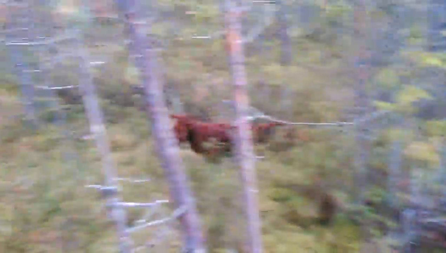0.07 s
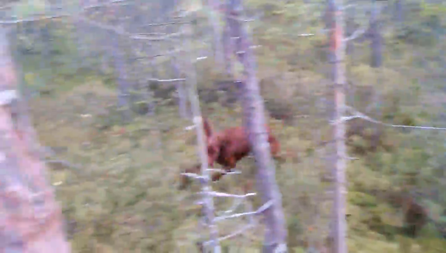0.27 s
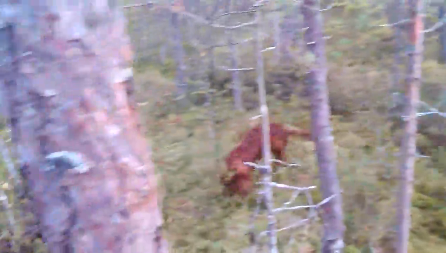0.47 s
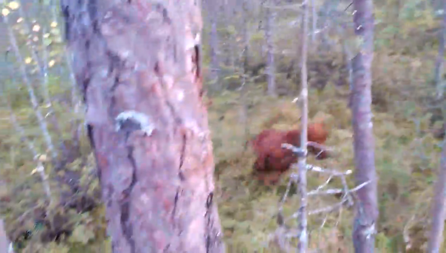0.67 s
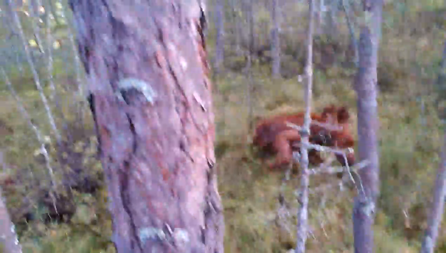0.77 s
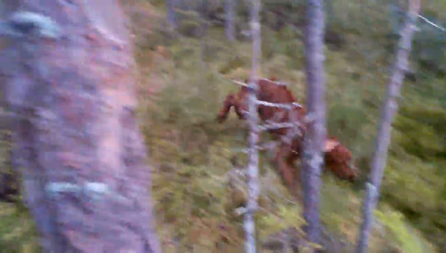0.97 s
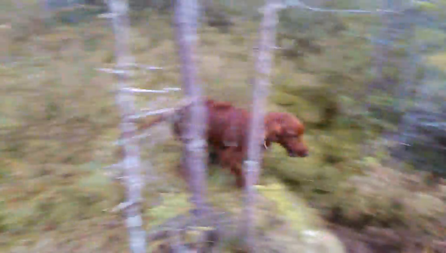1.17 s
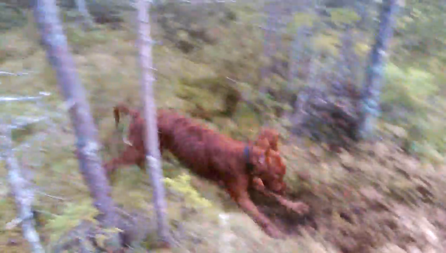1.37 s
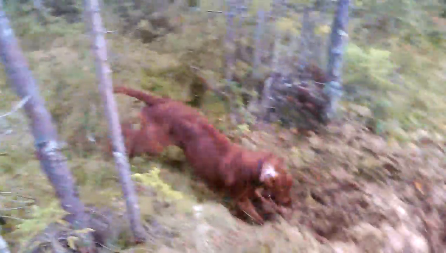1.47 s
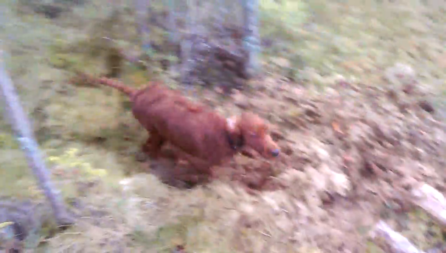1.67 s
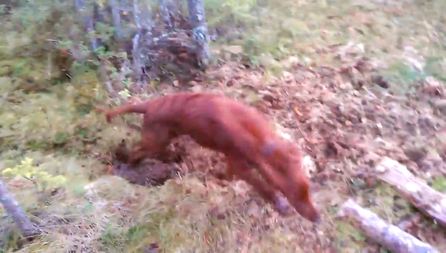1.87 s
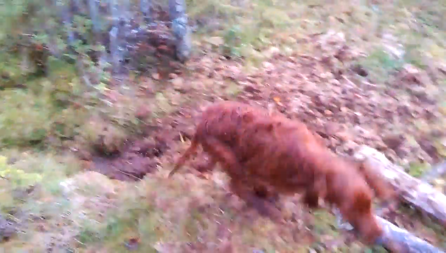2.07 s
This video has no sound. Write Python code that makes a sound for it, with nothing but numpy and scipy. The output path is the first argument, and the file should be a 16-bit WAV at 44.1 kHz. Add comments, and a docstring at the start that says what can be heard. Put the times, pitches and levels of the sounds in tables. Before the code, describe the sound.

Leaves swish and twigs crackle and snap under a dog's paws in a quiet forest.

```python
"""A dog in the undergrowth

A dog trots through low forest shrubs onto dry litter. Its legs swish through leaves and its paws
crush twigs: both are showers of tiny impulses. Twigs snap, sticks and roots knock in damped
vibration, and the soft ground thuds. Metal on its collar tinkles in its natural modes.
Trunks scatter a faint echo, and quiet forest air lies behind."""
import sys
import numpy as np
from scipy import signal
from scipy.fft import rfft, irfft
from scipy.io import wavfile
from scipy.ndimage import uniform_filter1d

SR = 44100
rng = np.random.default_rng(int(sys.argv[2]) if len(sys.argv) > 2 else 0)


def transcribe(signal):
    """Save signal, clipped to [-1, 1], as a 16-bit WAV file at the path in sys.argv[1]."""
    frames = np.atleast_2d(signal).T
    limited = np.clip(frames, -1, 1)
    pcm = np.round(limited * 32767).astype(np.int16)
    wavfile.write(sys.argv[1], SR, pcm)


N = 93183

# Swells of hiss: at 0.035 s a brief, faint puff around the first click; elsewhere legs brushing leaves.
# Each row: peak time, rise and fall in seconds, relative level in dB, rustle against hiss or ticks in dB.
HISS_SWELLS = [(.01, 0.0033, 0.0062, -50, -2.5), (.035, 0.0012, 0.0055, -46, -8),
               (.092, 0.049, 0.096, -55, -6), (.243, 0.027, 0.01, -62, -26),
               (.333, 0.03, 0.047, -48.5, -14.5), (.39, 0.033, 0.077, -54, -10),
               (.485, 0.023, 0.016, -54, -9.5), (.575, 0.045, 0.017, -55, -25),
               (.627, 0.027, 0.014, -55, -29), (.67, 0.022, 0.028, -55.5, -6),
               (.775, 0.013, 0.02, -57.5, -21), (.82, 0.17, 0.36, -63.5, -18),
               (.953, 0.03, 0.036, -52, -2.5), (1.058, 0.03, 0.032, -50.5, -9.5),
               (1.16, 0.025, 0.028, -49, -9), (1.208, 0.036, 0.014, -58, -0.5),
               (1.26, 0.04, 0.063, -57.5, -7.5), (1.436, 0.03, 0.021, -49.5, -9.5),
               (1.53, 0.084, 0.064, -66, -1), (1.63, 0.033, 0.018, -60, -9), (1.72, 0.005, 0.013, -60.5, 7),
               (1.755, 0.007, 0.05, -68.5, 9), (1.872, 0.019, 0.0053, -62.5, 6),
               (1.907, 0.016, 0.014, -50, -24), (1.967, 0.037, 0.0078, -59, 2.5),
               (2.025, 0.053, 0.068, -56, -15), (2.058, 0.024, 0.012, -53, -5), (2.1, 0.011, 0.048, -75, 6)]
# Spectra of the hiss, the rustle and the ticks. Each row: frequency in Hz, relative level in dB.
HISS_SPECTRUM = [(2000, -30), (4000, -6), (6000, -0.5), (8200, 6.5), (10300, 3.5), (12000, 0),
                 (16000, -12.5)]
RUSTLE_SPECTRUM = [(200, -5.5), (650, 5.5), (1400, -6), (2200, -2.5), (3000, -4.5), (5000, 1), (8000, 1.5),
                   (16000, -37.5)]
TICK_SPECTRUM = [(1500, -22), (4500, -24.5), (8000, -4.5), (11000, 4), (15500, -10)]

def swishes(shower_db=-1, ticks_db=-8):
    """Superposition: dense impulses merge into a hiss over a lower rustle; sparse ones tick."""
    shower = contacts(HISS_SWELLS, HISS_SPECTRUM, RUSTLE_SPECTRUM,
                      grains_per_s=6500, scatter_db=2.5, ripple_db=9.5)
    ticks = contacts(HISS_SWELLS, TICK_SPECTRUM, RUSTLE_SPECTRUM,
                     grains_per_s=600, scatter_db=-0.5, ripple_db=-4.0)
    return undb(shower_db) * shower + undb(ticks_db) * ticks


# Paws crushing twigs. Each row: peak time, rise and fall in seconds, level in dB,
# wood against the splinters in dB.
TWIG_CRUSHES = [(1.429, 0.018, 0.0098, -64, 7.5), (1.4425, 0.0059, 0.0027, -50.5, -2.5),
                (1.449, 0.0079, 0.005, -32.5, -8), (1.457, 0.0015, 0.0069, -38, -6),
                (1.466, 0.005, 0.015, -46, 0), (1.6663, 0.0014, 0.00091, -32, -23),
                (1.6688, 0.00087, 0.0037, -34, -20), (1.6727, 0.00048, 0.0036, -34.5, 3),
                (1.677, 0.00094, 0.0023, -30, -14), (1.689, 0.018, 0.014, -43, -9.5),
                (1.874, 0.026, 0.015, -58.5, 0.5), (1.889, 0.0063, 0.024, -66, 13.5)]
# Spectra of splinters and wood. Each row: frequency in Hz, relative level in dB.
SPLINTER_SPECTRUM = [(800, -42), (2500, -16.5), (4000, 3.5), (5500, -2), (7500, 7), (10500, 3.5),
                     (12500, 4), (16000, -10)]
WOOD_SPECTRUM = [(100, -27.5), (300, -1), (480, -10), (800, 4), (1000, -16), (1300, 10), (1650, -12),
                 (2000, -0.5), (2500, -1.5), (3000, -1.5), (3800, -4.5), (7000, -9), (16000, -76)]

def crunches():
    """Impulsive excitation: fibres splinter under a paw and shake the wood around them."""
    return contacts(TWIG_CRUSHES, SPLINTER_SPECTRUM, WOOD_SPECTRUM,
                    grains_per_s=8700, scatter_db=2.5, ripple_db=11.5)


# Twigs breaking. Each row: start in seconds, peak level in dB.
TWIG_BREAKS = [(0.0345, -33), (0.335, -40), (.476, -46), (0.485, -52), (.958, -35), (0.9624, -41),
               (1.0506, -42), (1.1493, -47), (1.1543, -47), (1.4453, -39), (1.453, -47), (1.465, -34),
               (1.618, -44), (1.629, -40), (1.639, -40), (1.668, -10), (1.6915, -36), (1.6955, -48)]
# Spectrum of a crack. Each row: frequency in Hz, relative level in dB.
CRACK_SPECTRUM = [(500, -10), (2500, -10), (5100, -5), (7000, -1.5), (9200, 11.5), (10600, 8.5),
                  (13500, -39), (16000, 5)]

def snaps():
    """Brittle fracture: a dry twig parts in one bright impulse."""
    out = np.zeros(N)
    crack = colour(signal.unit_impulse(512), CRACK_SPECTRUM)
    for start, db in TWIG_BREAKS:
        add(out, start, undb(db) * crack / np.abs(crack).max())
    return out


# Paws striking sticks, buried roots and soil. Each row: start in seconds, pitch in Hz, level in dB.
STICK_KNOCKS = [(.089, 644, -53), (.090, 2090, -50.5), (1.205, 2450, -57.5), (1.207, 3830, -45.5),
                (1.21, 4200, -46), (1.413, 762, -44.5), (1.414, 1000, -55), (1.441, 1910, -40),
                (1.442, 1290, -34), (1.449, 1400, -49), (1.457, 1360, -52), (1.458, 1970, -58),
                (1.740, 712, -49), (1.754, 660, -45), (1.870, 3030, -37.5), (1.871, 1790, -48),
                (1.873, 1104, -43), (1.880, 1160, -47), (1.881, 1670, -41), (1.8895, 1700, -38.5),
                (1.889, 1025, -47.5), (1.968, 2030, -49.5)]
ROOT_KNOCKS = [(.755, 310, -68), (.79, 334, -54), (.815, 337, -60)]
GROUND_THUDS = [(1.446, 262, -42.5), (1.471, 280, -59), (1.522, 304, -51), (1.673, 182, -54),
                (1.894, 121, -57), (1.963, 142, -59)]

def paw_impacts():
    """Damped vibration: sticks ring for a few cycles, roots for fewer, soft ground hardly at all."""
    sticks = blows(STICK_KNOCKS, decay_cycles=6.4, rasp=0.09, attack_s=0.00067, detune=0.079)
    roots = blows(ROOT_KNOCKS, decay_cycles=3.3, rasp=0.066, attack_s=0.0026, detune=0.086)
    ground = blows(GROUND_THUDS, decay_cycles=0.91, rasp=0.11, attack_s=0.0031, detune=0.079)
    return sticks + roots + ground


# Touches of the collar metal. Each row: start in seconds, relative level in dB, side-mode gain in dB.
COLLAR_TOUCHES = [(.237, -54.5, -12), (0.768, -54.5, 5.5), (.776, -58, -5), (0.864, -47.5, -21),
                  (.873, -37.5, -16), (0.879, -56, -11), (.885, -56, -1), (0.9, -56, -3),
                  (.914, -53.5, -15)]
# Its modes, the main one first. Each row: frequency in Hz, gain in dB, seconds to decay by 60 dB.
COLLAR_MODES = [(10190, 2, .08), (7420, -0.5, 0.058), (9530, 3, 0.049), (13100, 6, 0.034),
                (15400, 1, 0.094)]
# Spectrum of its chatter. Each row: frequency in Hz, relative level in dB.
CHATTER_SPECTRUM = [(6000, -26.5), (7800, -16), (8600, -3), (9800, -2), (10300, 11.5), (11000, -11),
                    (13000, -47), (16000, -31)]

def collar(chatter_db=-7, chatter_s=0.021, attack_s=0.00076, wobble=0.00584, wobble_s=0.0041):
    """Modal ringing: each touch chatters and excites the metal; loose contact unsettles its pitch."""
    out = np.zeros(N)
    t = np.arange(SR // 5) / SR
    for start, db, _ in COLLAR_TOUCHES:
        chatter = unit(colour(rng.standard_normal(len(t)), CHATTER_SPECTRUM))
        add(out, start, undb(db + chatter_db) * chatter * np.exp(-t / chatter_s))
    for mode, (hz, mode_db, t60) in enumerate(COLLAR_MODES):
        amplitude = np.zeros(N)
        envelope = np.exp(-np.log(1000) * t / t60) * (1 - np.exp(-t / attack_s))
        for start, db, side_db in COLLAR_TOUCHES:
            add(amplitude, start, undb(db + mode_db + side_db * (mode > 0)) * envelope)
        jitter = unit(uniform_filter1d(rng.standard_normal(N), int(wobble_s * SR)))
        pitch_hz = hz * (1 + wobble * jitter)
        out += amplitude * np.sin(2 * np.pi * np.cumsum(pitch_hz) / SR)
    return out


# Weight pressing on moss. Each row: peak time, rise and fall in seconds, level in dB,
# hollow sound against the rumble in dB.
MOSS_BUMPS = [(.235, 0.022, 0.011, -63, -14), (.45, 0.027, 0.011, -71, -3.5), (.545, 0.024, 0.05, -65, -1),
              (.73, 0.028, 0.034, -59.5, -7), (.805, 0.11, 0.12, -67.5, 1.5), (.945, 0.1, 0.021, -87, 3),
              (1.05, 0.028, 0.026, -63, -13), (1.18, 0.046, 0.035, -65, -23),
              (1.465, 0.015, 0.023, -54, -33), (1.54, 0.026, 0.046, -61.5, -2),
              (1.615, 0.014, 0.017, -63.5, 3.5), (1.677, 0.0023, 0.007, -75, -3),
              (1.74, 0.026, 0.044, -76, -8), (1.897, 0.028, 0.0095, -52.5, -15),
              (1.965, 0.036, 0.016, -66, 3), (2.075, 0.012, 0.078, -66.5, 2)]
# Spectra of the rumble and the hollow sound. Each row: frequency in Hz, relative level in dB.
RUMBLE_SPECTRUM = [(12, 5.5), (25, 8.5), (50, -17), (90, -17), (200, -16), (600, -103)]
HOLLOW_SPECTRUM = [(120, -14.5), (240, -3.5), (320, 5), (470, -15.5), (620, 1), (850, -10.5), (1100, -8.5),
                   (2000, -13), (6000, -45)]

def moss():
    """Compliance: soft ground yields under load with a low, hollow rumble."""
    return contacts(MOSS_BUMPS, RUMBLE_SPECTRUM, HOLLOW_SPECTRUM,
                    grains_per_s=4000, scatter_db=0.5, ripple_db=4.5)


def trees(x, db=-15.5, t60_s=0.49, cutoff_hz=2030):
    """Scattering: trunks return the sound as a faint, duller tail."""
    t = np.arange(SR // 2) / SR
    tail = filtered_noise(len(t), cutoff_hz, "low") * np.exp(-np.log(1000) * t / t60_s)
    return undb(db) * signal.fftconvolve(x, tail / np.linalg.norm(tail))[:N]


# Spectrum of the forest air. Each row: frequency in Hz, relative level in dB.
AIR_SPECTRUM = [(15, 13.5), (30, -9), (60, 0), (140, -11), (280, 1.5), (460, -2.5), (670, 0), (1050, -1.5),
                (1450, -9.5), (2800, -9.5), (5000, -11.5), (7500, -38), (11000, -13.5), (16000, -6.5)]

def air(db=-61.5):
    """Stationary noise: the forest background is low and even."""
    noise = colour(rng.standard_normal(N + SR), AIR_SPECTRUM)[SR:]
    return undb(db) * unit(noise)


def distant_rush(band_hz=(1400, 1560), db=-68, fade_s=0.4):
    """Narrow-band noise: a faint, far rushing dies out early."""
    fade = np.exp(-(np.arange(N) / SR / fade_s) ** 2)
    return undb(db) * unit(filtered_noise(N, band_hz, "band")) * fade


def contacts(rows, first_spectrum, second_spectrum, grains_per_s, scatter_db, ripple_db):
    """Amplitude modulation: two grain textures swell and die away under one envelope per row."""
    out, count = np.zeros(N), 2 ** 14
    edge_power = 1.29  # above 1: a rounder top and steeper flanks
    for peak, rise, fall, db, second_db in rows:
        start = max(peak - .1, 0)
        t = start + np.arange(count) / SR - peak
        envelope = undb(db) * np.exp(-np.maximum(-t / rise, t / fall) ** edge_power)
        first = texture(count, first_spectrum, grains_per_s, scatter_db, ripple_db)
        second = texture(count, second_spectrum, grains_per_s, scatter_db, ripple_db)
        add(out, start, envelope * (first + undb(second_db) * second))
    return out


def texture(count, spectrum, grains_per_s, scatter_db, ripple_db, ripple_hz=121.44):
    """Shot noise: random impulses, filtered to a spectrum with random resonances of its own."""
    hits = rng.random(count) < grains_per_s / SR
    sizes = undb(scatter_db * np.minimum(rng.exponential(size=count), 5))
    signs = np.sign(rng.standard_normal(count))
    grains = colour(hits * sizes * signs, spectrum)
    hz = np.arange(count // 2 + 1) * SR / count
    heights = np.clip(rng.standard_normal(400), -2, 1.5)
    ripple = np.interp(hz / ripple_hz, np.arange(400), heights)
    return unit(irfft(rfft(grains) * undb(ripple_db * ripple), count))


def blows(rows, decay_cycles, rasp, attack_s, detune):
    """Exponential decay: three detuned modes and contact noise fall to 1/e in decay_cycles."""
    out, t = np.zeros(N), np.arange(SR // 10) / SR
    for start, hz, db in rows:
        grit = unit(filtered_noise(len(t), [hz / 2, hz * 2], "band"))
        envelope = (1 - np.exp(-t / attack_s)) * np.exp(-t * hz / decay_cycles)
        modes_hz = hz * (1 + detune * rng.uniform(-0.83, 1, size=(3, 1)))
        ring = np.sin(2 * np.pi * modes_hz * t).mean(axis=0)
        add(out, start, undb(db) * envelope / envelope.max() * (ring + rasp * grit))
    return out


def colour(x, spectrum, size=4096):
    """Minimum-phase filtering through (Hz, dB) points."""
    hz, db = np.array(spectrum).T
    bins_hz = np.maximum(np.arange(size // 2 + 1) * SR / size, 1)
    gain = undb(np.interp(np.log(bins_hz), np.log(hz), db))
    cepstrum = irfft(np.log(gain))
    cepstrum[1:size // 2] *= 2  # folding onto positive time makes the filter causal
    cepstrum[size // 2 + 1:] = 0
    response = irfft(np.exp(rfft(cepstrum)))
    return signal.fftconvolve(x, response)[:len(x)]


def filtered_noise(count, hz, kind):
    """White noise through a first-order filter."""
    return signal.sosfilt(signal.butter(1, hz, kind, fs=SR, output="sos"), rng.standard_normal(count))


def undb(db):
    """Decibels to amplitude ratio."""
    return 10 ** (np.asarray(db) / 20)


def unit(x):
    """Normalisation to rms 1."""
    return x / np.sqrt(np.mean(x ** 2))


def add(out, start, x):
    """Superpose a short sound at a time in seconds."""
    i = max(int(start * SR), 0)
    out[i:i + len(x)] += x[:max(N - i, 0)]


def scene():
    """Superposition: the dog, its echo and the forest air sum in one channel."""
    near = paw_impacts() + swishes() + crunches() + snaps() + moss() + collar()
    return (near + trees(near) + air() + distant_rush())[None]


def record(dry):
    """Low-pass filtering: the treble ends steeply at 16 kHz."""
    return signal.sosfilt(signal.ellip(10, .2, 80, 16000, fs=SR, output="sos"), dry)


dry = scene()
out = record(dry)
transcribe(out)
```